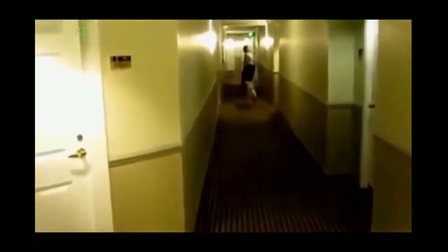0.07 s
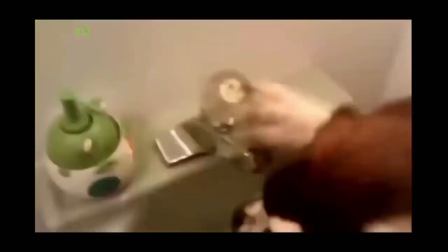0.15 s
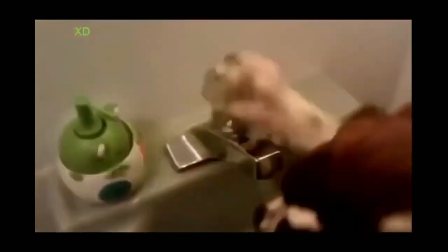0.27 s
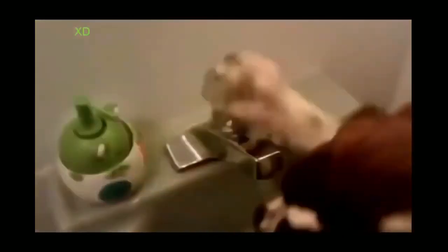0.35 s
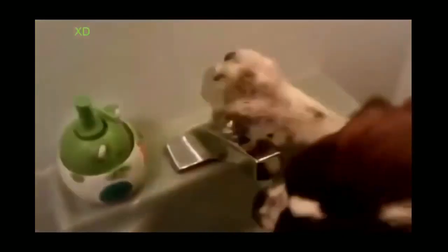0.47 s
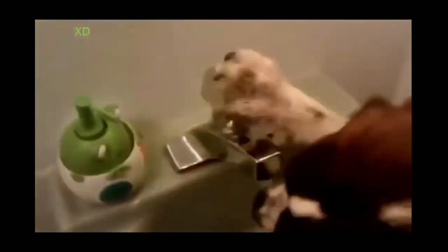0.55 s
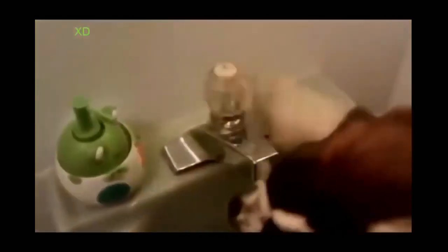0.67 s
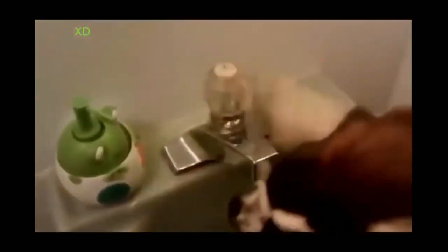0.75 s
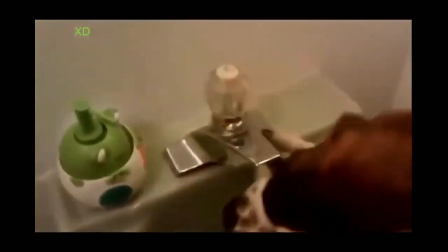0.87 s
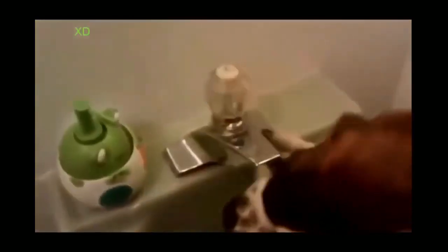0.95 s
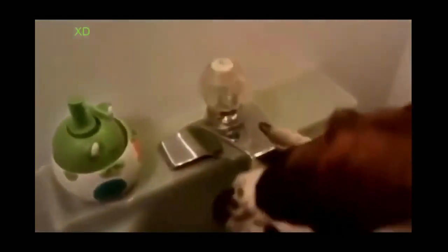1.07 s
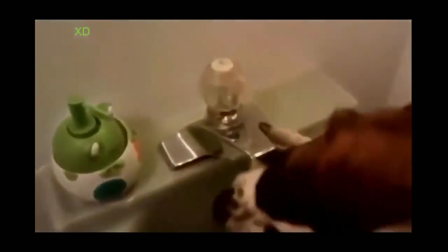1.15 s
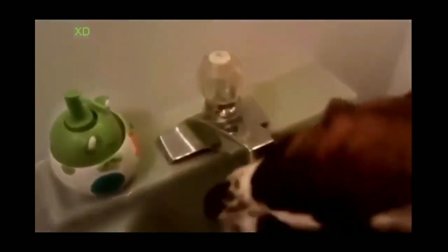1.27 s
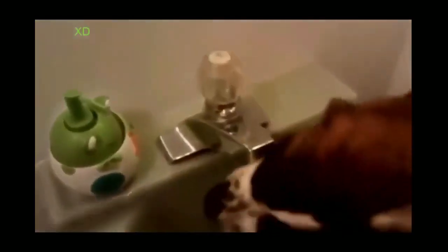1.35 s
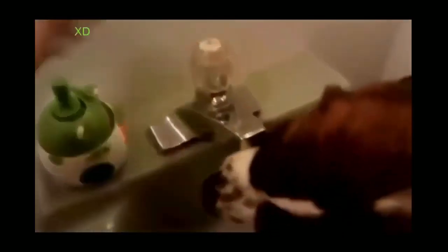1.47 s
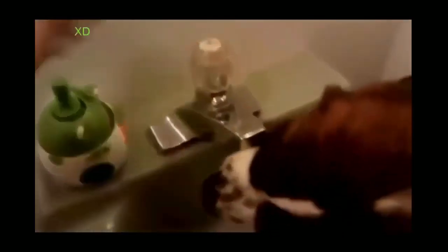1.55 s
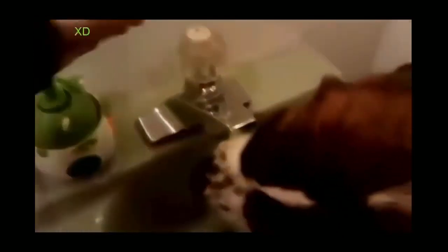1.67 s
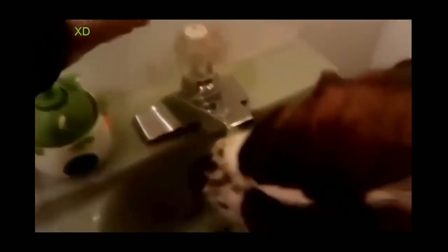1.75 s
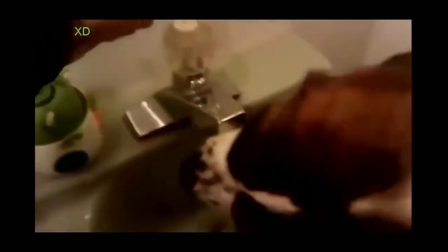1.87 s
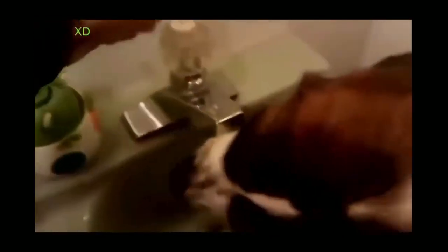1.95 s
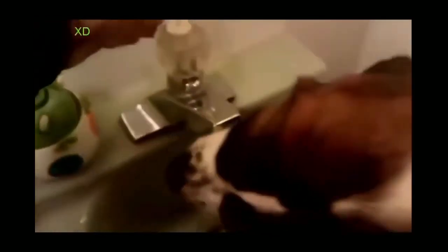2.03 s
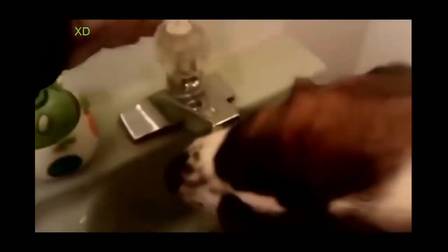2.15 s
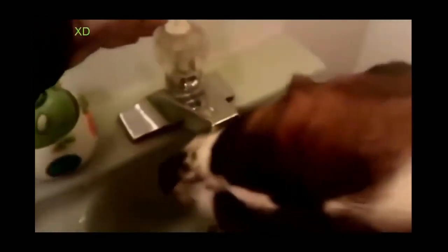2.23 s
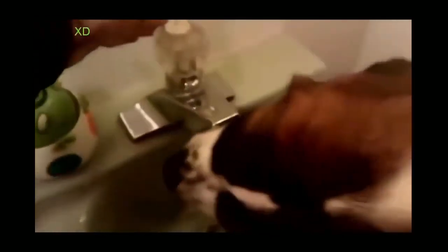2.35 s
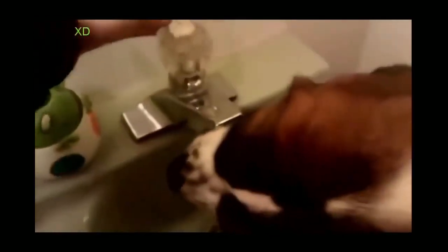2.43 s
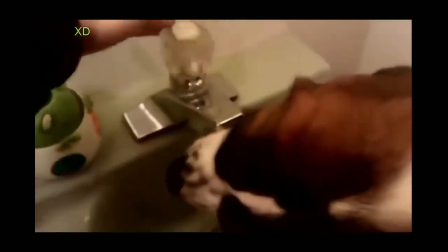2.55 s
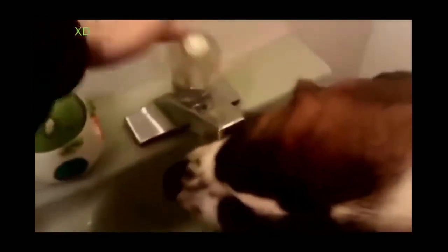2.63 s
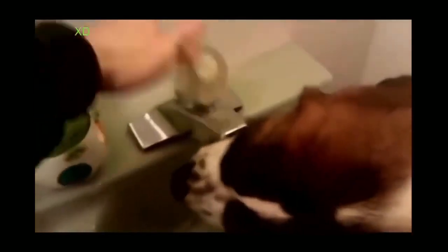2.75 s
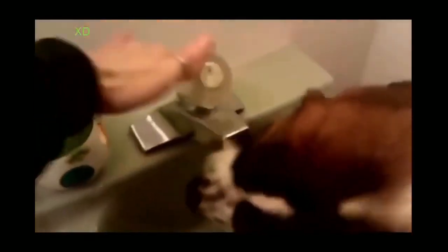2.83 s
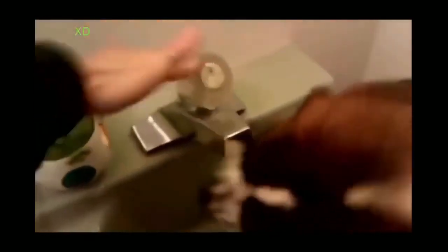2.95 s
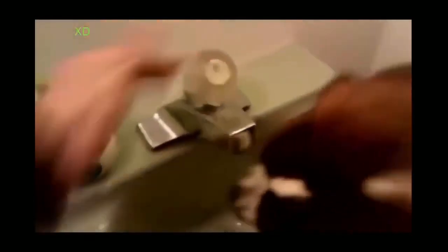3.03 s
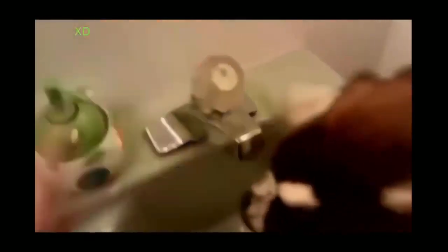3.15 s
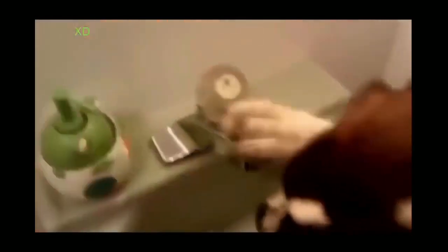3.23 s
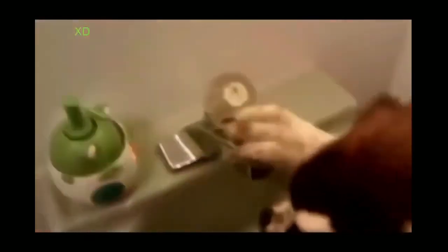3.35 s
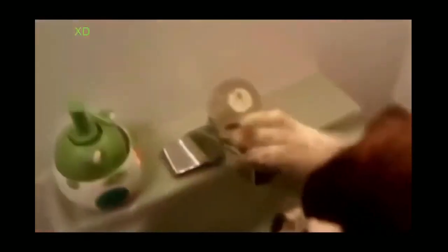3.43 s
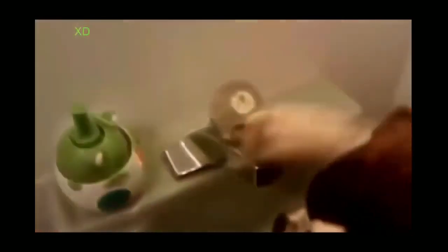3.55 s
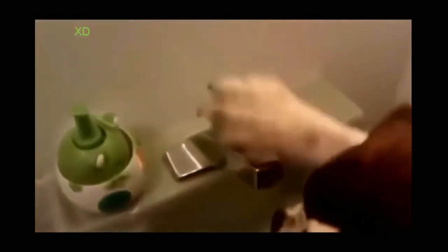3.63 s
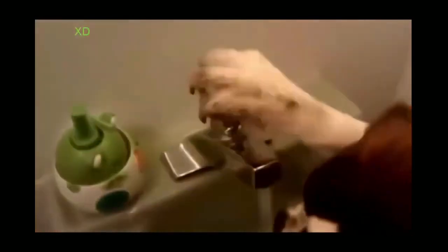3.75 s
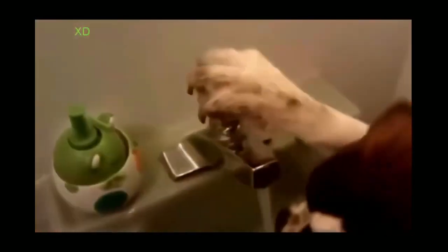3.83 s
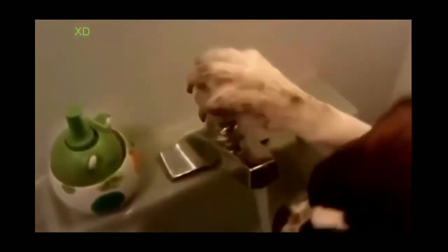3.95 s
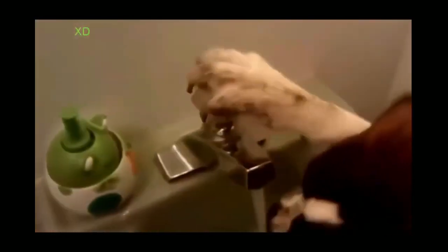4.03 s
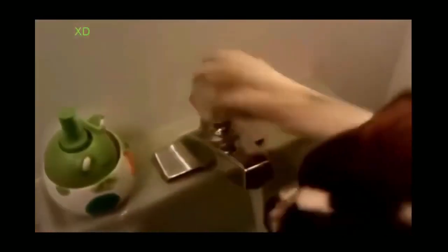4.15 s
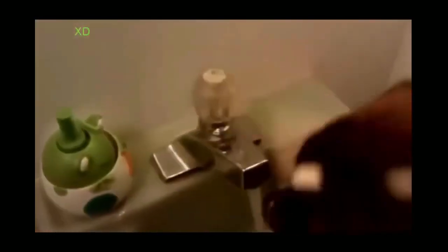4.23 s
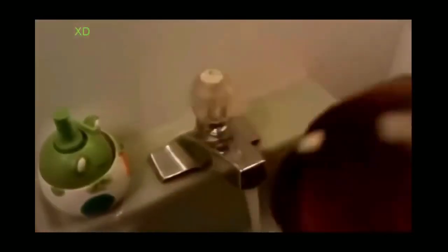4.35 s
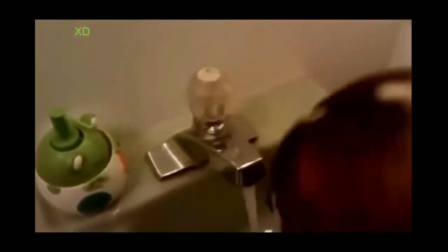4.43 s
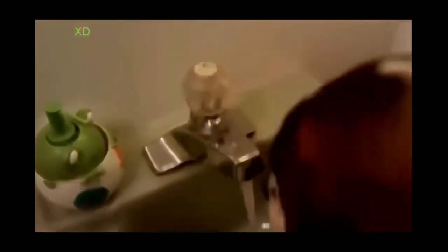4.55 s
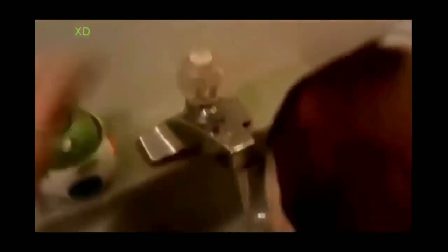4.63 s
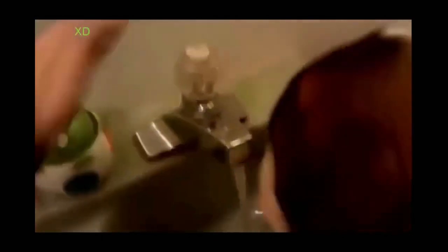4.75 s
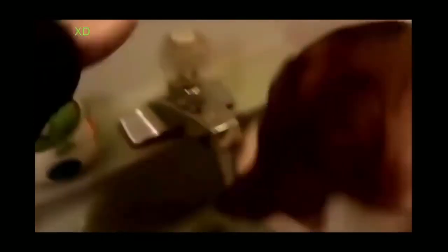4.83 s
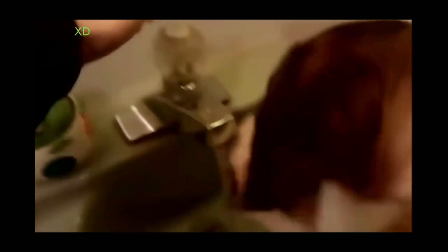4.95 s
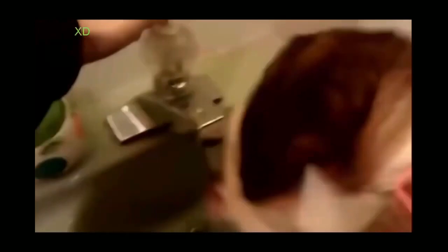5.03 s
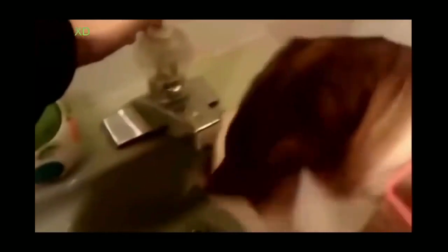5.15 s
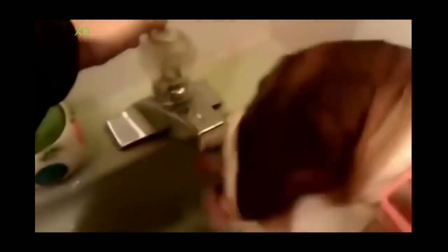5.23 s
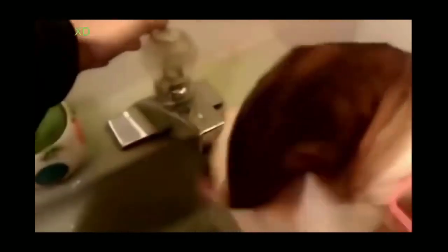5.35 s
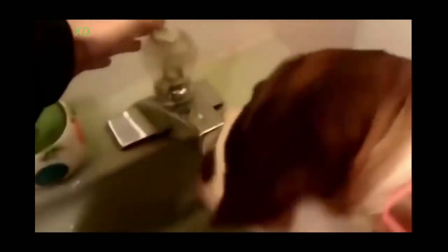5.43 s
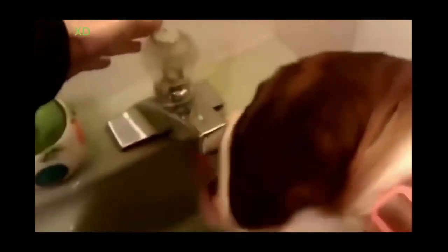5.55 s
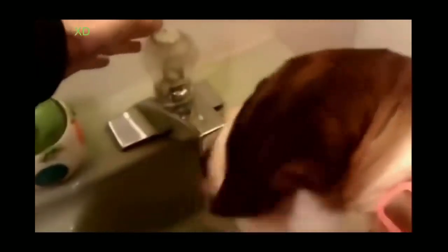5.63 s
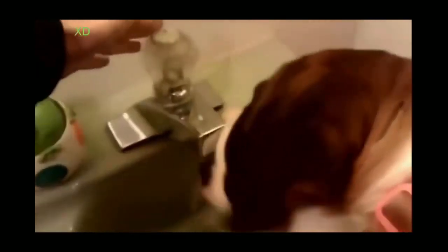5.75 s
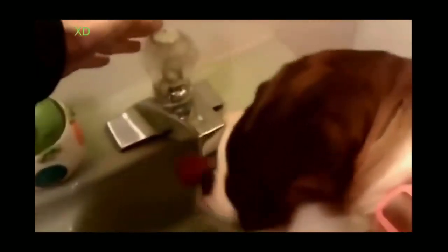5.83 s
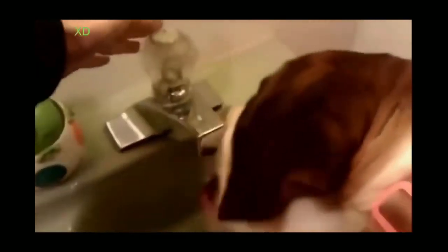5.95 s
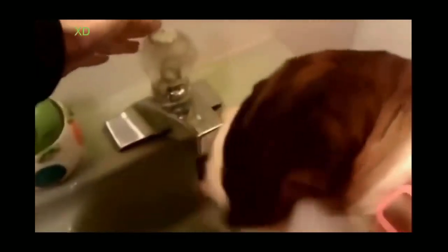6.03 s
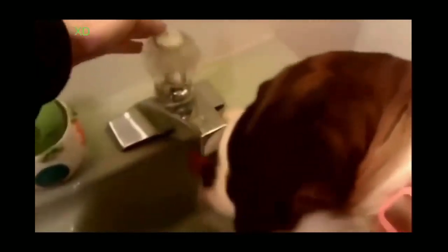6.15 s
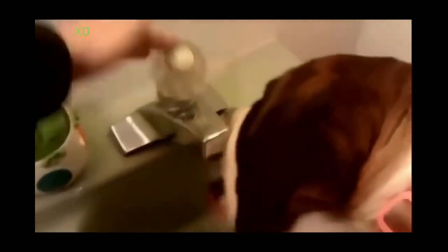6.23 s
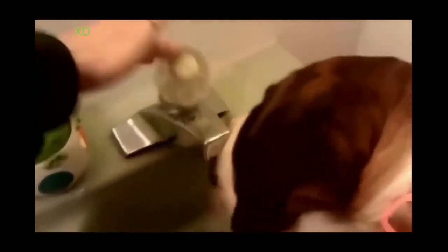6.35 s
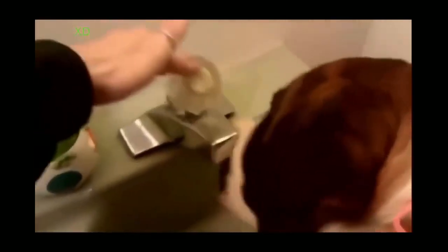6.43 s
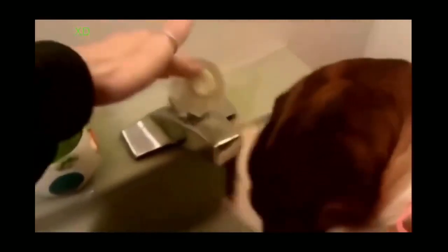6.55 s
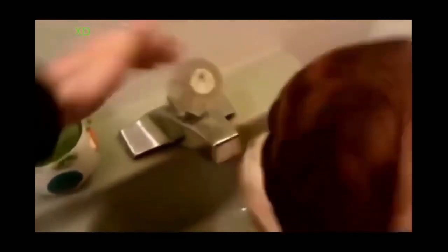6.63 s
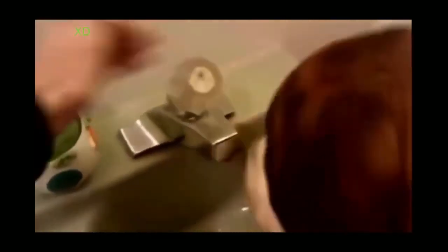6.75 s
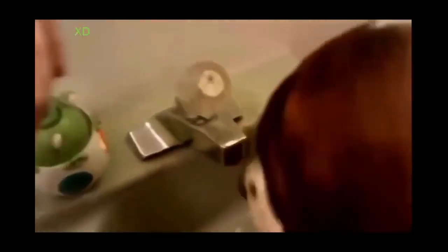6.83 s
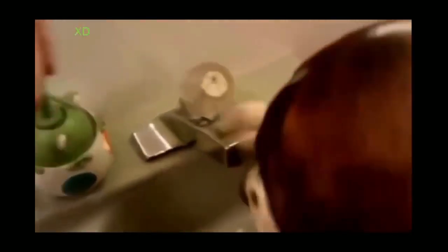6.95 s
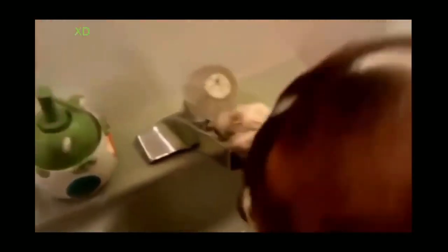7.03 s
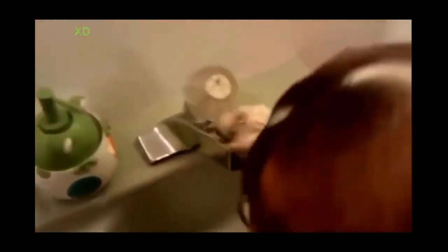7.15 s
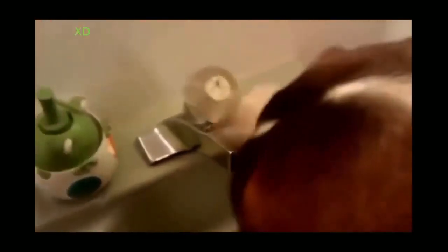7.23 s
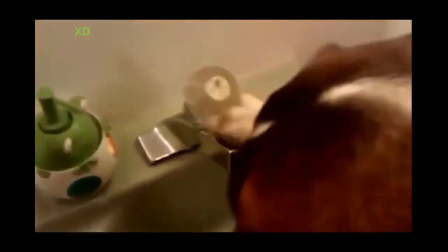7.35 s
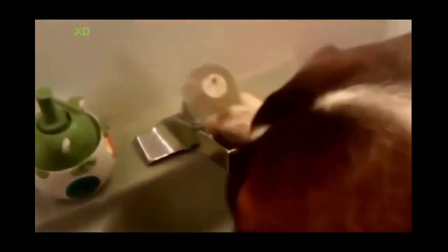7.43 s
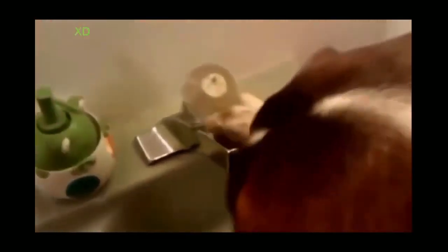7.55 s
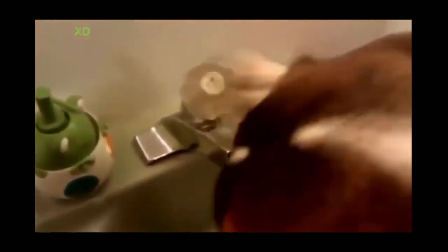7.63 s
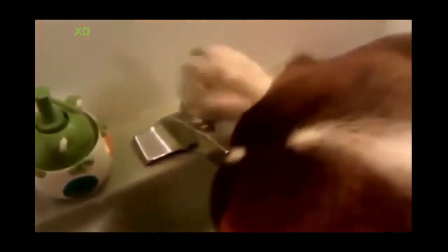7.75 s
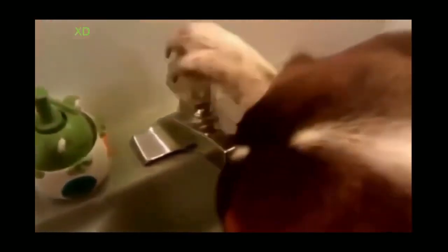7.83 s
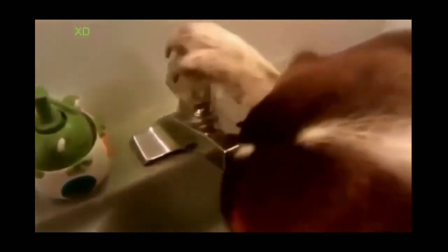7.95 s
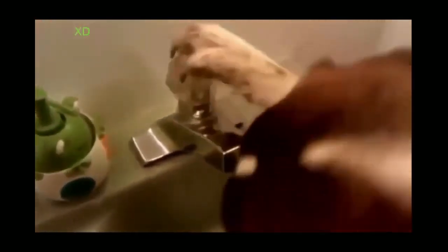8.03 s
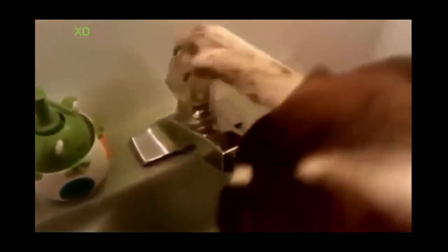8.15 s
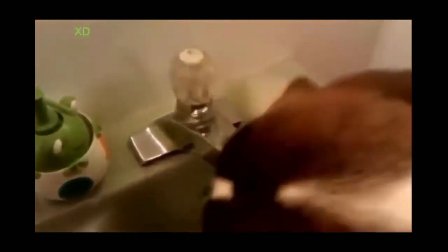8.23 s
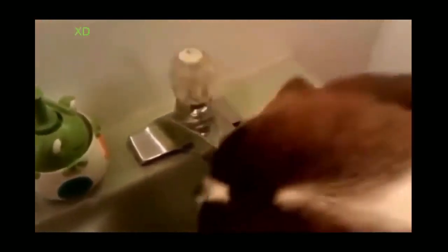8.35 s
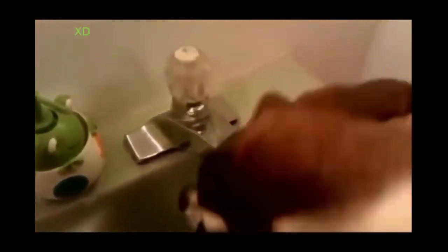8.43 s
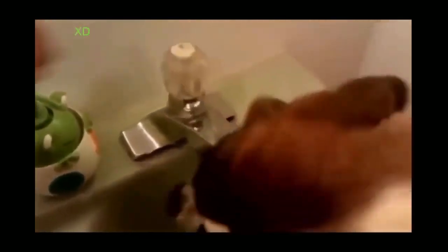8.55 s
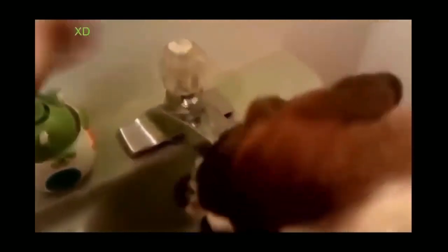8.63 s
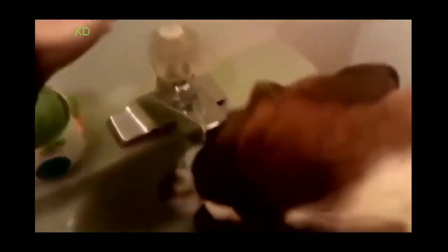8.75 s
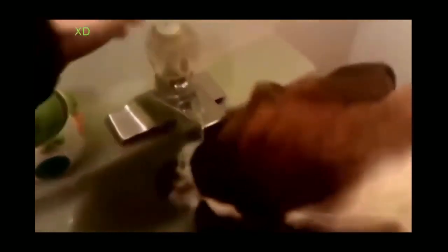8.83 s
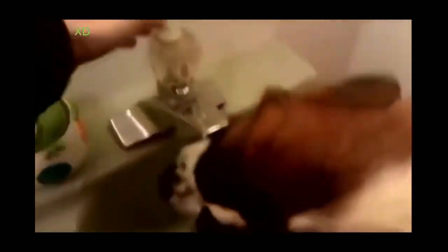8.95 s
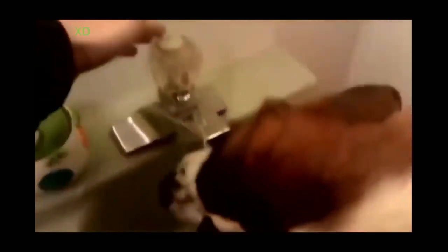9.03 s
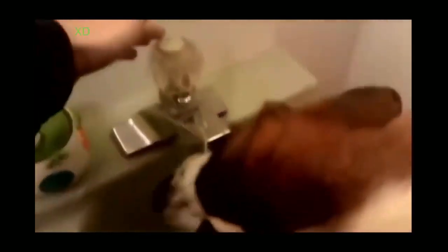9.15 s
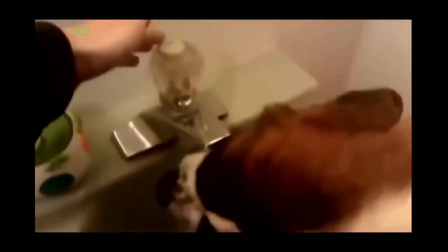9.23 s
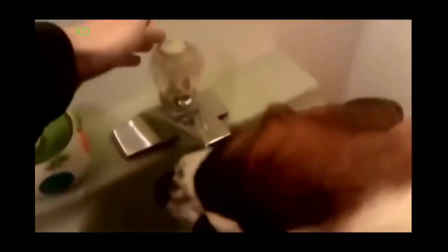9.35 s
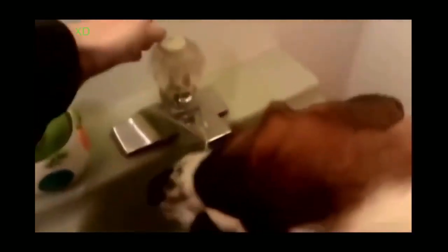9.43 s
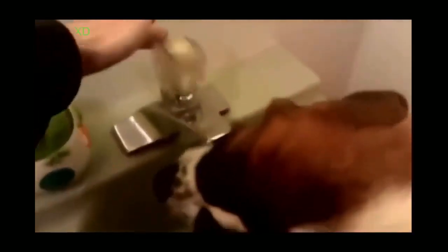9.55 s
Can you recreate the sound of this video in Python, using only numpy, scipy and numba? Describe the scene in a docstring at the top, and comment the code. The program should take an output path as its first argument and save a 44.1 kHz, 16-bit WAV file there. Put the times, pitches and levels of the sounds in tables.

```python
"""A hallway, dull and echoing with jingling dog tags, gives way abruptly to a small bathroom.
A tap runs into the sink: filtered droplets patter and damped, gliding sines ring as bubbles.
A dog laps, gulps and splashes, in noise slaps and clusters of bubbles.
The flow is shut off and the paw knocks it on again: claws ring the fitting's modes, the basin thumps.
Short noise echoes make the hard room, over a faint fan hum."""
import sys
import numpy as np
from scipy import signal
from scipy.fft import rfft, irfft
from scipy.io import wavfile
from scipy.ndimage import uniform_filter1d
from numba import njit

SR = 44100
rng = np.random.default_rng(int(sys.argv[2]) if len(sys.argv) > 2 else 0)


def int16_out(signal):
    """Quantize to a 16-bit WAV file."""
    q = np.round(np.clip(np.atleast_2d(signal).T, -1, 1) * 32767)
    wavfile.write(sys.argv[1], SR, q.astype(np.int16))


N = 422478
T = np.arange(N) / SR
RING = T[:SR // 2]  # half a second, the time axis of one event


def undb(db):
    """Decibels to gain."""
    return 10 ** (np.asarray(db) / 20)


def level(x, db=0):
    """Scale to an rms level."""
    return x * undb(db) / np.sqrt(np.mean(x ** 2))


def peak(x, db=0):
    """Scale so that the loudest few milliseconds have this rms level."""
    return x * undb(db) / np.sqrt(uniform_filter1d(x ** 2, size=128).max())


def burst():
    """Half a second of white noise, the raw material of one event."""
    return rng.standard_normal(len(RING))


def fade(t60):
    """Exponential decay of one event, 60 dB in t60 seconds."""
    return np.exp(-np.log(1000) * RING / t60)


def rise(s):
    """Soft onset of one event with time constant s."""
    return 1 - np.exp(-RING / s)


def run_out(length):
    """Envelope that falls to nothing at the given length in seconds."""
    return np.sqrt(np.maximum(1 - RING / length, 0))


def add(out, s, x):
    """Mix x into out at time s."""
    i = max(int(s * SR), 0)
    out[i:i + len(x)] += x[:N - i]


def band(x, hz, width):
    """Resonance with gain 1 at its centre."""
    hz = min(hz, .45 * SR)
    return signal.lfilter(*signal.iirpeak(hz, hz / min(width, SR / 3), SR), x)


def steep_band(x, hz, width):
    """The same resonance twice in a row, for steeper skirts."""
    return band(band(x, hz, width), hz, width)


def colour(x, spectrum):
    """Causal minimum-phase filter through (Hz, dB) points."""
    hz, db = np.transpose(spectrum)
    size = 8192
    bins_hz = np.arange(size // 2 + 1) * SR / size
    curve_db = np.interp(np.log(bins_hz + 1), np.log(hz), db)
    cepstrum = irfft(np.log(undb(curve_db)))
    cepstrum[1:size // 2] *= 2
    cepstrum[size // 2 + 1:] = 0
    response = irfft(np.exp(rfft(cepstrum)))
    return signal.fftconvolve(x, response)[:len(x)]


def walk(rate):
    """Slow random wavering with a spread near 1, drawn anew rate times a second and smoothed."""
    k = int(SR / rate)
    steps = np.repeat(rng.standard_normal(N // k + 1), k)
    return level(uniform_filter1d(steps, k)[:N])


def ring(modes, scatter_db, detune):
    """One blow on a set of decaying modes; each contact point weights them differently."""
    hz, db, t60 = np.transpose(modes)[:, :, None]
    size, shift, turn = rng.standard_normal((3, len(modes), 1))
    angle = 2 * np.pi * hz * (1 + detune * shift) * RING + np.pi * (turn > 0)
    return peak((undb(db + scatter_db * size) * fade(t60) * np.sin(angle)).sum(0))


@njit
def bubbles(n, start, hz, cycles, size, glide):
    """Damped sines that swell in a cycle or two, fall 50 dB over their length and glide up in pitch."""
    out = np.zeros(n)
    for k in range(len(start)):
        # length is counted in cycles of the starting pitch
        first, length, phase = int(start[k] * SR), int(cycles[k] * SR / hz[k]) + 2, 0.
        gain, loss = size[k], np.exp(-5.75 / length)
        for i in range(min(length, n - first)):
            phase += 2 * np.pi * hz[k] * (1 + glide * i / length) / SR
            out[first + i] += gain * np.sin(phase) * min(phase / 10, 1.)
            gain *= loss
    return out


def one_bubble(hz, cycles, glide):
    """A single bubble starting at once."""
    return bubbles(len(RING), np.zeros(1), np.array([1. * hz]), np.array([1. * cycles]), np.ones(1), 1. * glide)


def clumps(hz, octaves, cycles, spread_db, scatter_s, count, size):
    """Air goes under in pockets, each breaking into a few bubbles of like pitch."""
    when = rng.uniform(0, T[-1], (count, 1))
    pitch, strength = np.clip(rng.standard_normal((2, count, 1)), -2, 2)
    delay, own = rng.exponential(size=(2, count, size))
    gain = undb(spread_db * strength + 2 * np.minimum(own, 3))
    detuned = pitch + 0.447 * rng.standard_normal((count, size))
    pitch = np.clip(hz * 2 ** (octaves * detuned), 700, 11000)
    lengths = cycles * 2 ** rng.uniform(-0.95, 1, count * size)
    start = (when + scatter_s * delay).ravel()
    return level(bubbles(N, start, pitch.ravel(), lengths, gain.ravel(), 0.13))


# Tone of the bathroom air. Each row: frequency in Hz, relative level in dB.
AIR_TONE = [(20, -9.5), (50, -11), (120, -10), (220, -10), (450, -16), (1000, -16), (3500, -67),
            (7000, -73), (11000, -53), (15000, -46)]


def room_tone(hum_hz=124.4, hum_db=-64, drone_db=-61, air_db=-58):
    """Faint filtered air noise with a fan's wavering sine hum and its drone, a band of noise."""
    air, drone = rng.standard_normal((2, N))
    hum = level(np.sin(2 * np.pi * hum_hz * T) * undb(2 * walk(13)), hum_db)
    drone = level(band(band(drone, 310, 510), 373, 220), drone_db)
    return level(colour(air, AIR_TONE), air_db) + hum + drone


def bathroom(x, send, near_db=-7, tail_db=-13.0, near_t60=0.094, tail_t60=0.49):
    """Quick echoes of x from the bowl and wall; send feeds the short tail of a small hard room."""
    near, tail = rng.standard_normal((2, len(RING)))
    near = near * fade(near_t60) * (RING > .0015)
    tail = band(tail, 800, 10800) * fade(tail_t60) * (RING > .008)

    def echo(sound, response, db):
        """Convolve with a response of unit energy."""
        return undb(db) * signal.fftconvolve(sound, response / np.linalg.norm(response))[:N]

    return x + echo(x, near, near_db) + echo(send, tail, tail_db)


# Dull rush of the hallway. Each row: frequency in Hz, relative level in dB.
HALLWAY_TONE = [(24, -57), (40, -29), (156, -6), (554, -1.5), (710, -3.5), (1400, -8), (1800, -16),
                (2390, -17), (3560, -23), (3830, -20), (4230, -27), (5160, -25.5), (11700, -31),
                (15000, -53)]
# Touches of the dog tags. Each row: start in seconds, relative peak level in dB.
TAG_HITS = [(0.0, -23.5), (0.026, -27), (0.084, -21.5), (0.104, -21.5), (0.127, -24.5), (0.166, -25)]
# Ring of the tags. Each row: frequency in Hz, relative level in dB, t60 in seconds.
TAG_MODES = [(6990, -8, 0.4), (6940, -4, 0.29), (8300, -30, .2), (10100, -10, 0.18), (11700, 2, 0.19),
             (11600, 3, 0.13), (11300, -7, 0.25), (11800, -3, 0.17)]


def hallway(rush_db=-31.5, fall_db_per_s=10, swell_db=0.3, rustle_db=-31, surge_db=-39,
            surge_s=0.347, surge_width_s=0.046, clash_db=-7, tags_db=-4.0):
    """A dull rush, brighter at first, dies down and surges once more while metal tags jingle."""
    rush, rustle = rng.standard_normal((2, N))
    # the rush passes through rush_db at 0.16 s; the other levels are before their envelopes
    out = level(colour(rush, HALLWAY_TONE), rush_db) * undb(fall_db_per_s * (0.16 - T) + swell_db * walk(20.5))
    out += level(steep_band(rustle, 2700, 1300), rustle_db) * np.exp(-T / 0.034)
    out += level(steep_band(rustle, 1500, 1400), surge_db) * np.exp(-((T - surge_s) / surge_width_s) ** 2)
    for s, db in TAG_HITS:
        clash = peak(band(band(burst(), 6400, 4000), 9600, 3600) * fade(0.16), clash_db)
        jingle = ring(TAG_MODES, 4, 0.002)
        add(out, s, peak(jingle + clash, db + tags_db))
    return out


# Soft low swells. Each row: start in seconds, peak level in dB, length in seconds, centre in Hz.
LOW_SWELLS = [(0.456, -43, 0.49, 24), (1.653, -43, 0.11, 30), (2.687, -34.5, 0.12, 80),
              (3.54, -45, 0.42, 21.8), (3.97, -43, 0.36, 24.3), (4.704, -41, 0.18, 25),
              (7.599, -39, 0.31, 22), (8.705, -34, 0.2, 25)]


def low_swells():
    """Soft low bumps: narrow noise under half a sine of envelope."""
    out = np.zeros(N)
    for s, db, length, hz in LOW_SWELLS:
        swell = np.sin(np.pi * np.minimum(RING / length, 1))
        add(out, s, peak(steep_band(burst(), hz, hz) * swell, db))
    return out


# Clinks of the collar. Each row: start in seconds, peak level in dB before the room.
COLLAR_HITS = [(2.547, -29), (5.365, -30.5)]
# Ring of the collar. Each row: frequency in Hz, relative level in dB, t60 in seconds.
COLLAR_MODES = [(6450, 3, 0.076), (11900, -12, 0.1)]


def collar():
    """Metal on the collar touches as the dog's head bobs."""
    out = np.zeros(N)
    for s, db in COLLAR_HITS:
        add(out, s, peak(ring(COLLAR_MODES, 1, 0.001), db))
    return out


# Runs of the tap. Each row: knob hits its open stop in seconds, clack relative peak in dB,
# basin thump relative peak in dB, dog starts drinking in seconds, tap is shut in seconds.
TAP_RUNS = [(0.6823, -20.5, -28, 1.78, 3.11), (4.0888, -12, -32, 5.52, 6.68),
            (8.1508, -18.5, -24.5, 8.6, 9.7)]
# Paw landing or dog leaning on the basin. Each row: start in seconds, relative peak level in dB.
BASIN_THUMPS = [(0.443, -24), (1.632, -37), (1.722, -39), (2.424, -40), (3.139, -39), (3.556, -32.5),
                (3.587, -28.5), (3.655, -39.5), (3.975, -26.5), (7.2477, -27.5), (7.526, -39.5),
                (7.612, -28.5), (7.908, -42), (7.984, -30.5), (8.056, -30)]
# Basin body. Each row: frequency in Hz, relative level in dB, t60 in seconds.
BASIN_MODES = [(117.5, -13.5, 0.5), (243, -10, 0.2), (288.6, 6, 0.075), (344.4, -3.5, 0.16),
               (425, -5, 0.037), (471, -6.5, 0.025), (573, -13, .05), (665, 0, 0.13), (877, -7, 0.11)]
# Clack of the knob at its stop. Each row: frequency in Hz, relative level in dB.
CLACK_TONE = [(180, -12.5), (300, 3), (523, -26), (1330, -11.5), (2440, -4.5), (2600, -3.5), (4050, -5),
              (6840, -25.5), (10800, -38), (15000, -54)]
# Dull thud of the cabinet under the basin. Each row: frequency in Hz, relative level in dB.
CABINET_TONE = [(60, -10), (120, -6.5), (180, -7), (330, 3), (450, -2.5), (700, -10), (1100, -11),
                (3000, -19.5), (8000, -56)]


def knocks(stop_db=-4, thump_db=-2.0, push_s=0.0019, push_t60=0.24, note_db=-1, note_hz=295, note_t60=0.19):
    """The valve clacks on its stop and sounds the basin's main note; the paw's uneven push makes it thud."""
    out = np.zeros(N)
    for s, db, basin_db, *_ in TAP_RUNS:
        note = np.sin(2 * np.pi * note_hz * RING) * fade(note_t60) * (1 - fade(0.019))
        add(out, s, peak(note, basin_db + note_db))
        clack = burst() * (fade(0.032) + 0.32 * fade(0.35))
        add(out, s, peak(colour(clack, CLACK_TONE), db + stop_db))
    for s, db in [(s, basin_db) for s, _, basin_db, _, _ in TAP_RUNS] + BASIN_THUMPS:
        push = burst() * rise(push_s)
        boom = signal.fftconvolve(push * fade(push_t60), ring(BASIN_MODES, 0.96, 0.019))[:len(RING)]
        thud = colour(push * fade(0.35), CABINET_TONE)
        add(out, s, peak(peak(boom, -1) + peak(thud), db + thump_db))
    return out


# Paw dragging over the wet knob. Each row: start in seconds, relative peak level in dB,
# length in seconds, resonance in Hz, its width in Hz.
PAW_SCRAPES = [(0.417, -35.5, 0.026, 3300, 1600), (0.458, -30.5, 0.085, 3660, 1610),
               (0.544, -28, 0.036, 3030, 500), (0.582, -40, 0.18, 2860, 1400),
               (3.894, -34, 0.056, 2980, 1220), (6.991, -26.5, 0.031, 2650, 800),
               (7.03, -40, 0.16, 2850, 2200), (7.594, -32, 0.12, 2580, 2980),
               (7.657, -30.5, 0.035, 5260, 1800), (8.013, -27.5, 0.048, 2230, 350)]


def scrapes(slips_per_s=520, spread_db=5.0, slip_t60=0.0078, grip_s=0.0033, size=90):
    """The pad grips, then slips in uneven fading jerks, each a tiny burst into one resonance."""
    out = np.zeros(N)
    for s, db, length, hz, width in PAW_SCRAPES:
        when = np.cumsum(rng.uniform(.3, 1.7, size)) / slips_per_s
        strength = undb(spread_db * rng.standard_normal(size))
        jerks = np.bincount((when * SR).astype(int), strength, len(RING))[:len(RING)]
        slips = signal.fftconvolve(jerks, fade(slip_t60))[:len(RING)]
        rasp = slips * rise(grip_s) * run_out(length) * burst()
        add(out, s, peak(band(band(rasp, hz, width), hz, 2 * width), db))
    return out


# Claws striking the knob. Each row: start in seconds, relative peak level in dB,
# pitch in Hz that the contact point favours, relative level of the treble click in dB.
CLAW_HITS = [(0.4398, -29, 3510, -4), (0.4509, -20, 3570, -7), (0.4942, -24.5, 4100, 0),
             (0.596, -39, 4160, -20), (3.5514, -25, 3620, -20), (3.5613, -21.5, 3730, -4),
             (3.589, -23.5, 3870, -20), (3.6546, -15, 3610, -12), (3.6628, -23.5, 3460, 7),
             (3.8855, -35.5, 3700, -24), (3.9686, -19.5, 4060, -5), (7.2476, -18, 3670, -25),
             (7.5232, -17.5, 3440, -35), (7.5933, -34, 3570, -23), (7.6216, -24, 3830, -21),
             (7.9273, -23, 3580, -24), (7.9543, -31, 3570, -26), (7.9864, -23, 3910, -22),
             (8.0583, -31, 3900, -20)]
# Ring of the tap fitting. Each row: frequency in Hz, relative level in dB, t60 in seconds.
FITTING_MODES = [(2620, -17, .06), (3506, -9.5, 0.044), (3590, -20, 0.12), (3627, -3.5, 0.041),
                 (3680, -4.5, 0.019), (3947, -0.5, 0.03), (4083, -2, 0.013), (4130, -15, 0.034),
                 (5170, -3, 0.018), (8670, -7, 0.092), (8720, -15, 0.044)]


def brushes(brush_db=-44, lead_s=0.021, hz=3400):
    """Wet fur brushes the knob just before each claw lands: a swell of banded noise."""
    out = np.zeros(N)
    for s, *_ in CLAW_HITS:
        swell = np.sin(np.pi * np.minimum(RING / (2 * lead_s), 1)) ** 2
        add(out, s - lead_s, peak(band(band(burst(), hz, hz), hz, 2 * hz) * swell, brush_db))
    return out


def claws(click_db=-7, graze_db=-10, select_db=8, select_hz=260, bright_db=-6, bright_growth=2.5,
          rattle=1.2, rattle_per_s=260, contact_s=0.0004):
    """Claws ring the fitting; the contact point picks the modes, the loose knob breaks up their ring."""
    out = np.zeros(N)
    for s, db, pitch, treble_db in CLAW_HITS:
        noise = burst()
        click = peak(band(band(noise, 6100, 6200), 5000, 9000) * fade(0.052), treble_db + click_db)
        graze = peak(band(band(noise, 3400, 3800), 1900, 4500) * fade(0.11), graze_db)
        tilt_db = bright_growth * treble_db + bright_db  # per octave above 4200 Hz
        modes = []
        for hz, mode_db, t60 in FITTING_MODES:
            off_pitch_db = select_db * min(abs(hz - pitch) / select_hz, 1)
            modes.append((hz, mode_db - off_pitch_db + tilt_db * max(np.log2(hz / 4200), 0), t60))
        wobble = level(uniform_filter1d(burst(), size=int(SR / rattle_per_s)))
        chatter = 2.5 + rattle * wobble * (1 - fade(0.05))
        tink = peak(ring(modes, 1.5, .005) * chatter)
        add(out, s, peak((tink + click + graze) * rise(contact_s), db))
    return out


def tap(fill_s=0.24, first_spurt_db=-20, shut_db_per_s=134, drain_db=-14.5, drain_db_per_s=32, dribble_db=-24):
    """Flow in dB re a full stream, building up, shut fast, then draining; and seconds of drinking."""
    flow, drinking = np.full(N, undb(dribble_db)), np.zeros(N)
    for opened, _, _, drinks, shut in TAP_RUNS:
        filling = (T > opened) * undb(first_spurt_db * np.clip(1 - (T - opened) / fill_s, 0, 1))
        since = np.maximum(T - shut, 0)
        flow += filling * np.maximum(undb(-shut_db_per_s * since), undb(drain_db - drain_db_per_s * since))
        # the count holds after shutting until the tap opens again
        drinking = np.where(T > opened, np.clip(T - drinks, 0, shut - drinks), drinking)
    return 20 * np.log10(flow), drinking


# Spray of the stream. Each row: frequency in Hz, relative level in dB.
SPRAY_TONE = [(120, -10.5), (220, -10), (310, -7), (470, -18.5), (700, -14.5), (1300, -6.5), (1600, -8.5),
              (2100, -4.5), (2900, -10), (4200, -1), (6000, -0.5), (7300, -12.5), (11000, -12),
              (12300, -23), (15500, -28)]
# Bands in which the pool sings. Each row: centre in Hz, width in Hz, relative level in dB.
POOL_BANDS = [(1690, 300, 1), (2874, 630, 4.5), (3557, 400, 1.5)]


def stream(spray_db=-40.5, gurgle_db=-37.5, burble_db=-39, drop_spread_db=3.5, flutter_db=2.0,
           drum_db=-22, pocket_db=-12, pool_db=-6, pool_waver_db=3.0):
    """Droplets patter on the bowl and drum its body while entrained air rings as small bubbles."""
    flow, drinking = tap()
    muzzle = 1 - np.exp(-drinking / 0.41)  # 0 for a clear stream, towards 1 with the muzzle in it
    # the muzzle takes some spray and bobs; spray falls slightly less than gurgle as the flow weakens
    spray = spray_db + 0.88 * flow + muzzle * (-4.5 + 2.5 * walk(7.2))
    gurgle = gurgle_db + flow - 2 * muzzle  # a broken stream drags less air under
    count = 90000
    strength = undb(drop_spread_db * np.minimum(rng.exponential(size=count), 5))
    drops = np.bincount(rng.integers(0, N, count), rng.choice([-1, 1], count) * strength, N)
    patter = colour(drops, SPRAY_TONE)
    patter = patter / np.std(band(patter, 8280, 3340))
    drum = level(sum(undb(db) * steep_band(drops, hz, hz / 6) for hz, db, _ in BASIN_MODES), drum_db)
    beads = clumps(hz=7250, octaves=0.321, cycles=64, spread_db=2.5, scatter_s=.002, count=1800, size=3)
    fizz = clumps(hz=3610, octaves=0.375, cycles=38.0, spread_db=5.0, scatter_s=.004, count=1700, size=5)
    # the dent that the stream digs in the pool sheds larger bubbles
    pocket = clumps(hz=2710, octaves=0.155, cycles=32, spread_db=2.5, scatter_s=0.0034, count=520, size=2)
    pocket = undb(pocket_db) * pocket
    # the droplets keep the pool singing
    singing = sum(undb(db + pool_waver_db * walk(40)) * steep_band(drops, hz, width)
                  for hz, width, db in POOL_BANDS)
    pocket += level(singing, pool_db)
    hiss = (patter + beads) * undb(spray + flutter_db * walk(35))
    # the tongue folds air into the stream in loose, liquid burbles
    burble = clumps(hz=2890, octaves=0.5, cycles=21, spread_db=6.5, scatter_s=.006, count=300, size=3)
    burble = burble * undb(burble_db + flow) * (1 + muzzle) / 2
    # the gurgle wavers more once the dog has broken the stream
    waver_db = (2.5 + 0.7 * muzzle) * walk(22)
    return hiss + burble + (fizz + pocket + drum) * undb(gurgle + waver_db)


def drips(per_s=12, db=-45, hz=2200, spread_db=-7.5, octaves=0.47, flow_growth=0.11, size=120):
    """Loosely spaced faint drips, a little louder with more flow: rows of (s, relative dB, Hz)."""
    flow, _ = tap()
    slip, strength, pitch = rng.uniform(-1.1, 1, (size, 3)).T
    start = (np.arange(size) + 1 + slip) / per_s
    rows = np.transpose([start, db + spread_db * strength, hz * 2 ** (octaves * pitch)])
    rows = rows[rows[:, 0] < T[-1]]
    return [(s, drip_db + flow_growth * flow[int(s * SR)], pitch_hz) for s, drip_db, pitch_hz in rows]


# Loudest drops and gulped air pockets. Each row: start in seconds, relative peak level in dB,
# starting pitch in Hz.
LOUD_PLOPS = [(0.747, -26.5, 1870), (0.869, -30, 1610), (2.348, -23, 1520), (2.627, -21.5, 843),
              (3.106, -34.5, 1070), (3.439, -29, 2040), (4.287, -21.5, 1950), (4.31, -31, 1770),
              (5.642, -18, 1980), (6.263, -24.5, 1290), (6.526, -23, 2250), (6.566, -21, 2440),
              (6.605, -24, 885), (7.046, -29.5, 1740), (7.17, -34.5, 2050), (7.194, -34.5, 1340),
              (7.341, -29, 1470), (7.351, -29, 1990), (9.533, -23, 854)]


def plops(gain_db=-2, cycles=30, glide=0.091, swell_s=0.0026, splat_db=-7):
    """Drops and larger air pockets each make a small noise splat and one hollow bubble note."""
    out = np.zeros(N)
    for s, db, hz in LOUD_PLOPS + drips():
        note = one_bubble(hz, cycles, glide)
        splat = band(band(burst(), 1.68 * hz, hz), 0.57 * hz, 2 * hz) * fade(0.037)
        add(out, s, peak((peak(note) + peak(splat, splat_db)) * rise(swell_s), db + gain_db))
    return out


# Single drops cracking on the wet bowl. Each row: start in seconds, relative peak level in dB,
# starting pitch in Hz.
CRACKING_DROPS = [(2.213, -20, 2690), (2.255, -22, 3900), (2.389, -22, 2700), (2.4305, -20, 4000),
                  (5.027, -22, 2680), (5.649, -18, 4200), (5.682, -18.5, 4100), (6.055, -23, 3370),
                  (6.444, -29, 4170), (6.567, -24, 2500), (6.703, -23, 4820), (6.9915, -27.5, 6150),
                  (7.046, -35, 3870), (7.168, -43, 4200), (7.3408, -34.5, 3280), (8.718, -21.5, 2700),
                  (9.214, -21.5, 2660)]


def spits(cycles=36, glide=1.04, crack_db=-5, crack_t60=0.017):
    """A drop cracks on the bowl and its bubble chirps upwards as it bursts."""
    out = np.zeros(N)
    for s, db, hz in CRACKING_DROPS:
        chirp = one_bubble(hz, cycles, glide)
        crack = band(burst(), hz, hz) * fade(crack_t60)
        add(out, s, peak(peak(chirp) + peak(crack, crack_db), db))
    return out


# Water fanning off the muzzle. Each row: start in seconds, relative peak level in dB, length in seconds.
WATER_FANS = [(1.015, -29, 0.031), (1.52, -27.5, 0.015), (2.268, -29.5, 0.086), (2.39, -30, .06),
              (2.542, -29.5, 0.043), (2.662, -26.5, 0.082), (2.814, -31, 0.053), (2.919, -38, 0.049),
              (4.675, -26.5, 0.091), (5.3, -29, 0.06), (5.749, -29, 0.11), (5.996, -27, 0.051),
              (6.247, -26.5, 0.033), (6.295, -31, 0.025), (6.333, -32, 0.076), (6.534, -39, 0.054),
              (8.49, -28.5, 0.047), (8.873, -30, 0.034), (8.982, -29, 0.043), (9.038, -26.5, 0.049),
              (9.144, -27, .025), (9.428, -33.5, 0.027), (9.527, -21.5, .03)]


def swishes(drops_per_s=2500, spread_db=5, hz=4500, width=3600, rise_s=0.0047):
    """Each fan of water sprinkles the bowl as a short shower of sharp droplets."""
    out = np.zeros(N)
    for s, db, length in WATER_FANS:
        hits = rng.random(len(RING)) < drops_per_s / SR
        drops = hits * undb(spread_db * np.clip(burst(), -2, 2))
        shower = drops * rng.choice([-1, 1], len(RING)) * rise(rise_s) * run_out(length)
        add(out, s, peak(band(band(shower, hz, width), hz, 2 * width), db))
    return out


# The muzzle churning the water. Each row: start in seconds, relative peak level in dB,
# longest time in seconds over which bubbles start, middle bubble pitch in Hz.
MUZZLE_GULPS = [(1.926, -23, 0.065, 1560), (2.322, -21, 0.06, 1720), (2.604, -26.5, 0.12, 1790),
                (2.975, -30, 0.11, 1860), (3.311, -33, 0.066, 1890), (3.43, -32, 0.062, 2740),
                (5.158, -41, 0.061, 1010), (5.447, -34.5, 0.16, 1134), (5.889, -28, 0.12, 1800),
                (6.243, -25, 0.083, 1800), (6.334, -27, 0.08, 1385), (6.402, -24, 0.035, 2400),
                (6.509, -29.5, 0.11, 1770), (6.027, -32.5, 0.036, 1200), (6.73, -30.5, .04, 2700),
                (8.764, -33.5, 0.027, 1220), (8.97, -31, 0.069, 1310), (9.235, -30.5, 0.078, 1110),
                (9.471, -24.5, 0.27, 1520)]


def gulps(gain_db=2, per_s=800, octaves=0.674, cycles=16, spread_db=5.0, size=110):
    """A churn of larger, quickly damped bubbles; the small ones tend to come loudest."""
    out = np.zeros(N)
    for s, db, length, hz in MUZZLE_GULPS:
        strength, shift = np.clip(rng.standard_normal((2, size)), -2, 2)
        start = np.cumsum(rng.exponential(size=size)) / per_s
        start -= start[0]
        gain = undb(spread_db * strength + shift) * (start <= length)
        pitch = hz * 2 ** (octaves * shift)
        churn = bubbles(len(RING), start, pitch, np.full(size, 1. * cycles), gain, 0.18)
        add(out, s, peak(churn, db + gain_db))
    return out


# Loudest laps of the tongue. Each row: start in seconds, relative peak level in dB, bubble pitch in Hz.
TONGUE_LAPS = [(0.9735, -21.5, 3400), (1.1232, -17.5, 3500), (1.731, -23.5, 4600), (1.9839, -12, 3950),
               (2.212, -16.5, 3750), (2.413, -22, 3900), (2.6673, -24.5, 3330), (2.871, -25, 2760),
               (2.987, -22.5, 4450), (3.075, -29, 4500), (3.207, -20, 4200), (4.2774, -19, 2250),
               (4.587, -18, 3730), (5.39, -19, 2780), (5.4834, -18.5, 3300), (5.63, -18.5, 3330),
               (5.816, -19.5, 3456), (5.93, -19.5, 3740), (6.3604, -23.5, 3580), (6.429, -27, 2340),
               (6.481, -21, 3520), (6.567, -29, 2660), (6.607, -16, 3300), (6.771, -20.5, 3890),
               (6.923, -31, 3600), (6.9905, -34, 5700), (8.4261, -23.5, 3570), (8.647, -13.5, 4900),
               (8.9224, -20, 2700), (9.1945, -19.5, 2850), (9.4968, -18, 2718), (9.559, -23.5, 4100)]


def splashes(gain_db=1, slap_db=-7, octaves=0.4, cycles=18, swell_s=0.0008, scatter_s=.0075, count=14):
    """Each lap slaps the water and sheds a fading cluster of bubbles."""
    out = np.zeros(N)
    for s, db, hz in TONGUE_LAPS:
        delay = rng.exponential(size=count) * (np.arange(count) > 0)  # the first bubble comes at once
        shift = octaves * rng.standard_normal(count) * np.minimum(delay + 0.087, 1)
        pitch = np.clip(hz * 2 ** shift, 600, 9000)
        lengths = cycles * 2 ** rng.uniform(-0.2, 1, count)
        cluster = bubbles(len(RING), delay * scatter_s, pitch, lengths, np.exp(-.7 * delay), 0.36)
        slap = band(band(burst(), hz, hz), hz, 2 * hz) * fade(0.17)
        add(out, s, peak((peak(cluster) + peak(slap, slap_db)) * rise(swell_s), db + gain_db))
    return out


# Air resonances in the bowl. Each row: centre in Hz, width in Hz, relative level in dB.
BOWL_BANDS = [(1700, 220, -6), (2950, 260, -11)]


def bowl(water):
    """The air in the bowl resonates along with the water."""
    return water + sum(undb(db) * band(water, hz, width) for hz, width, db in BOWL_BANDS)


# Splashes lose their top in the water. Each row: frequency in Hz, gain in dB.
WATER_CUSHION = [(1000, -5.5), (6000, -0.5), (7500, -7), (11000, -1.5), (12500, -15), (15500, -16)]
# Wet fur softens the top of the paw's contacts. Each row: frequency in Hz, gain in dB.
WET_FUR = [(5000, -2), (9000, -9.5), (12000, -9.5), (15500, -13)]


def scene(change_s=0.402, water_db=-4.0, paw_room_db=-4):
    """The hallway gives way to the sink in a 4 ms crossfade."""
    water = bowl(stream() + colour(splashes() + gulps(), WATER_CUSHION))
    water = undb(water_db) * water + plops() + colour(swishes() + spits(), WATER_CUSHION)
    paw = colour(claws() + scrapes() + brushes(), WET_FUR) + knocks()
    # the knob is close by, so less of the room is heard on it
    send = water + undb(paw_room_db) * paw
    sink = bathroom(water + paw + collar(), send) + room_tone()
    before = np.clip((change_s - T) / .004, 0, 1)
    return (before * hallway() + (1 - before) * (sink + low_swells()))[None]


def record(dry, top_hz=15800):
    """A steep low-pass cuts off the top."""
    return signal.sosfilt(signal.ellip(10, .1, 80, top_hz, fs=SR, output="sos"), dry)


dry = scene()
out = record(dry)
int16_out(out)
```